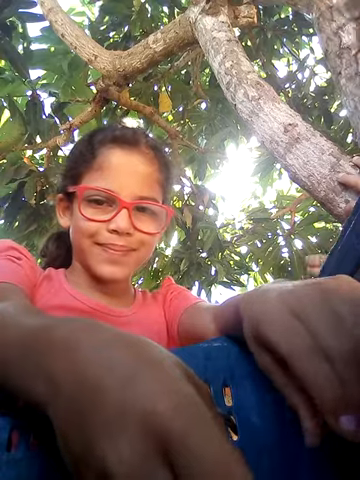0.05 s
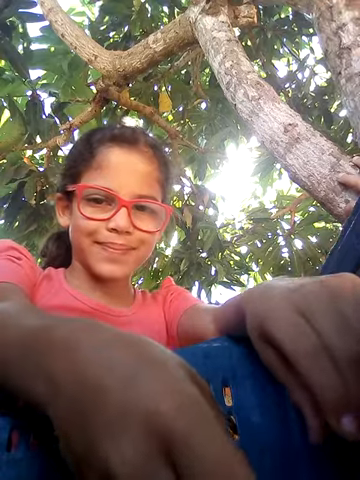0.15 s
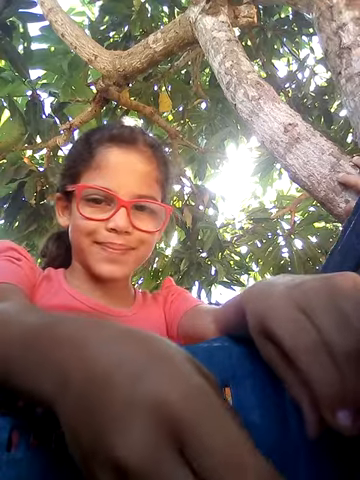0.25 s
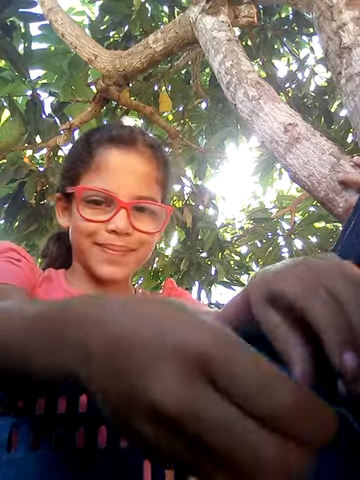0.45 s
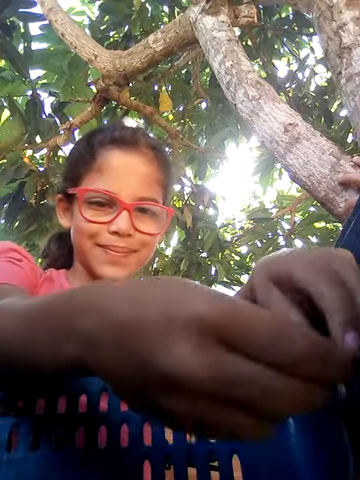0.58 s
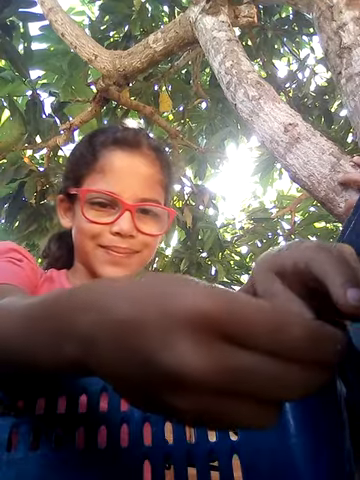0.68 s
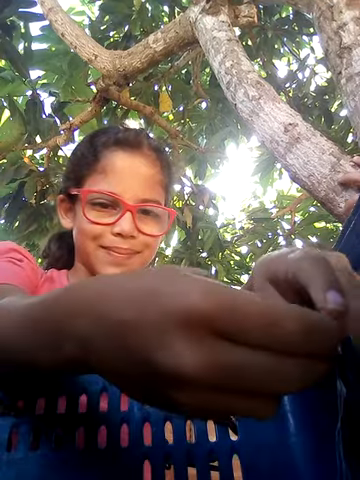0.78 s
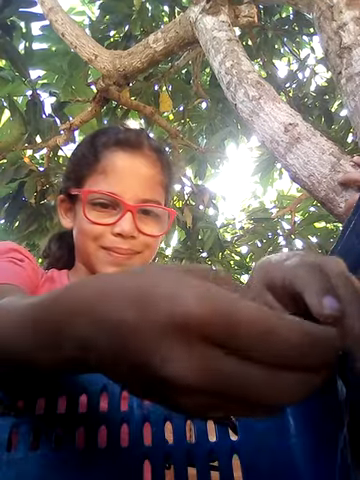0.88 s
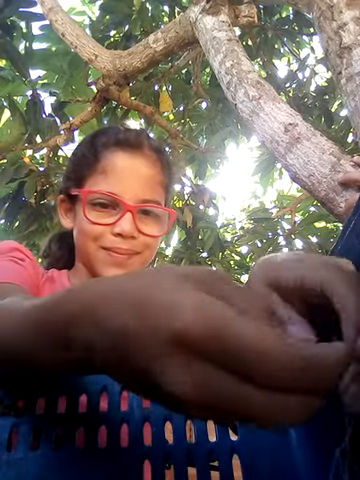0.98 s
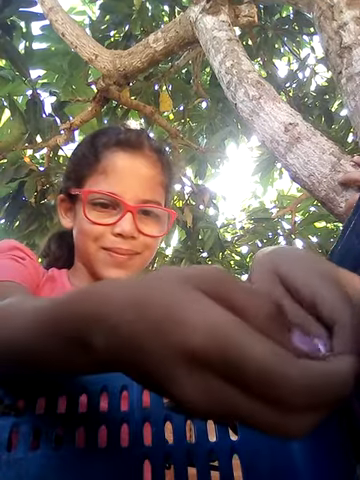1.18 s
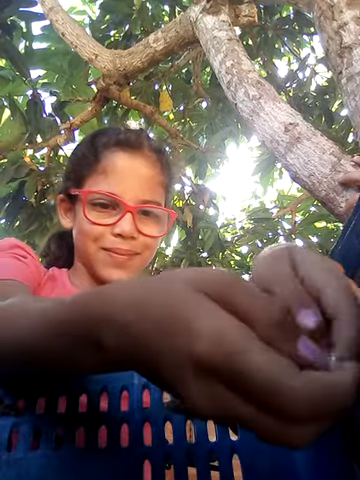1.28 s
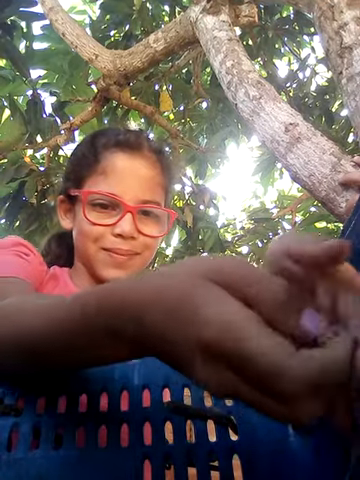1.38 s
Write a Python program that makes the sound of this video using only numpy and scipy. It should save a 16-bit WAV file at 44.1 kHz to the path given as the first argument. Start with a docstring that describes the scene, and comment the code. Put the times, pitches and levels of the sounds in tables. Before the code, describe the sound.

Small plastic beads drop into a plastic container with a hollow knock and a bright rattle. They shift, drop again and settle, then two dry snaps follow. The sound is close, in a quiet garden.

```python
"""Small plastic beads drop into a plastic container, shift about and drop again, close by.
Heavy impacts excite the hollow body's resonances, single beads click, and many tiny collisions merge
into a rattle that settles; two dry snaps follow. Sliding friction hisses just before the first drop.
Hands shift with a soft rumble, and the garden behind is quiet."""
import sys
import numpy as np
from scipy.fft import rfft, irfft, next_fast_len
from scipy.io import wavfile
from scipy.ndimage import uniform_filter1d, map_coordinates

SR = 44100
rng = np.random.default_rng(int(sys.argv[2]) if len(sys.argv) > 2 else 0)


def wrap_up_sound(samples):
    """Save the sound to the file named by the first command line argument, as 16-bit audio."""
    columns = np.atleast_2d(samples).T
    # keep every value between -1 and 1, then stretch to whole-number steps
    tamed = np.clip(columns, -1, 1)
    steps = np.round(tamed * 32767).astype(np.int16)
    wavfile.write(sys.argv[1], SR, steps)


N = 63945
FFT = next_fast_len(N + SR // 2, True)
HZ = np.fft.rfftfreq(FFT, 1 / SR)
T = np.arange(N) / SR
TREBLE_SHARE = 1 / (1 + (7070 / (HZ + 1)) ** 10)  # rises from 0 to 1 around 7070 Hz

def amp(db):
    """Decibels to amplitude ratio."""
    return 10 ** (np.asarray(db) / 20)

def unit(x):
    """Normalisation to rms 1."""
    return x / np.sqrt(np.mean(x ** 2) + 1e-20)

def crest(x):
    """Normalisation of the loudest millisecond to rms 1."""
    return x / np.sqrt(uniform_filter1d(np.mean(x ** 2, 0), 44).max())

def along(points):
    """Interpolation of (Hz, value) points over log frequency."""
    hz, values = np.transpose(points)
    return np.interp(np.log(HZ + 1), np.log(hz + 1), values)

def sides(db):
    """Panning by level difference, left over right."""
    return amp(np.array([np.atleast_1d(db), -np.atleast_1d(db)]) / 2)

def causal(db):
    """Minimum-phase response from a gain curve, by folding the cepstrum."""
    cepstrum = irfft(np.log(amp(db) + 1e-6))
    half = len(cepstrum) // 2
    cepstrum[1:half] *= 2
    cepstrum[half + 1:] = 0
    return np.exp(rfft(cepstrum))

def filtered(x, response):
    """Convolution as a product of spectra."""
    return irfft(rfft(x, FFT) * response, FFT)[..., :N]

def add(out, start, sound):
    """Superposition of a sound from its start in seconds."""
    i = max(round(start * SR), 0)
    out[:, i:i + sound.shape[1]] += sound[:, :N - i]

def hiss(spectrum):
    """Spectrally shaped stereo noise of rms 1."""
    return unit(filtered(rng.standard_normal((2, N)), amp(along(spectrum))))

def wobble(knots_per_s):
    """Smooth modulation: a spline through random knots."""
    return map_coordinates(rng.standard_normal(int(N * knots_per_s / SR) + 4), [T * knots_per_s])

# The garden's hiss. Each row: frequency in Hz, level in dB.
GARDEN_SPECTRUM = [(500, -7), (1400, 1.5), (2100, -5), (3000, -5), (4200, -25), (5600, 6.5), (6300, 1),
                   (8200, -23.5), (11500, -18), (13000, -34), (15200, -11.5), (16500, -49)]
def garden():
    """Stationary noise forms a faint ambient floor."""
    return amp(-64) * hiss(GARDEN_SPECTRUM) * sides(db=-2.0)

# The hands' rumble. Each row: frequency in Hz, level in dB.
RUMBLE_SPECTRUM = [(25, -16.5), (60, -19.5), (125, -0.5), (220, -3), (320, -11), (450, -17), (3000, -77.5)]
# Its envelope. Each row: time in seconds, level in dB.
RUMBLE_LEVELS = [(0, -75.5), (.11, -58), (.17, -68.5), (.33, -64), (.64, -65), (.93, -72.5), (1.05, -63.5),
                 (1.17, -61), (1.235, -78), (1.3, -63.5), (1.43, -76.5)]
# Finger bumps. Each row: start in seconds, level in dB.
FINGER_BUMPS = [(.042, -54.5), (1.179, -53), (1.388, -55.5)]
def hands():
    """Shifting hands make modulated low noise; each bump is a damped oscillation."""
    bump_hz, rise_s, t60_s = 189, 0.0069, 0.023
    level_db = np.interp(T, *np.transpose(RUMBLE_LEVELS)) + 3.0 * wobble(55)
    out = amp(level_db) * hiss(RUMBLE_SPECTRUM)
    envelope = (1 - np.exp(-T / rise_s)) * amp(-60 * T / t60_s)
    bump = crest(envelope * np.sin(2 * np.pi * bump_hz * T)[None])
    for start, db in FINGER_BUMPS:
        add(out, start, amp(db) * bump)
    return out * sides(db=16)

# The sliding hiss. Each row: frequency in Hz, level in dB.
SLIDE_SPECTRUM = [(500, -15), (2600, -16.5), (3050, 6.5), (3500, -4), (3850, 0.5), (4400, -19), (6000, -12),
                  (8000, -49)]
def slide():
    """Sliding friction gives a thin, uneven noise that ends at the first drop."""
    start_s, rise_s, end_s, fall_s = 0.048, 0.032, 0.21, 0.0045
    stroke = np.clip((T - start_s) / rise_s, 0, 1) * np.clip((end_s - T) / fall_s, 0, 1)
    return amp(-48.5 + 2.7 * wobble(130)) * stroke * hiss(SLIDE_SPECTRUM) * sides(db=-7)

# Stereo phase. Each row: frequency in Hz, lead of the left channel in radians.
LEFT_LEAD = [(380, -1), (780, 1), (1000, 1.5), (1250, 4), (1750, 4), (2500, 7.5), (3400, 7.5), (4300, 5),
             (5300, 4.5)]
def arrival():
    """Phase difference: a wave reaches the two channels out of step."""
    return np.array([np.ones(len(HZ)), np.exp(-1j * along(LEFT_LEAD))])

def bright_peak_db(pitch_hz, height_db=8.5, width_octaves=0.15):
    """A bright spectral peak, usually near 5.3 kHz, that colours clicks, snaps and rattle."""
    return height_db * np.exp(-(np.log2((HZ + 1) / pitch_hz) / width_octaves) ** 2)

def impacts(rows, spectrum, rise_s, t60_s, tail_db, tail_t60_s, size=4096):
    """Two-stage decay: each impact is a bright crack, then a scatter between the walls."""
    out, t, hz = np.zeros((2, N)), np.arange(size) / SR, np.fft.rfftfreq(size, 1 / SR)
    envelope = (1 - np.exp(-t / rise_s)) * (amp(-60 * t / t60_s) + amp(tail_db - 60 * t / tail_t60_s))
    phase = np.array([np.interp(hz, HZ, channel) for channel in arrival()])
    tone = rfft(irfft(causal(along(spectrum)), FFT)[:size]) * phase
    for start, db, pitch_hz, treble_db in rows:
        crack = (rng.standard_normal(size) + rng.standard_normal((2, size))) * envelope
        colour = causal(np.interp(hz, HZ, bright_peak_db(pitch_hz) + treble_db * TREBLE_SHARE))
        impact = irfft(rfft(crack) * tone * colour)[:, :size // 2]
        add(out, start, amp(db) * crest(impact))
    return out

def ringing(modes, rise_s=0.00039):
    """Free vibration: a sum of damped modes, with random phase in each channel."""
    t = np.arange(SR // 4) / SR
    tones = sum(amp(db - 60 * t / t60) * np.sin(2 * np.pi * (hz * t + rng.random((2, 1))))
                for hz, db, t60 in modes)
    return tones * (1 - np.exp(-t / rise_s))

# Beads snapping in the fingers. Each row: start in seconds, level in dB, pitch in Hz, treble in dB.
FINGER_SNAPS = [(.9991, -35.5, 6100, -7), (1.0562, -28, 4860, -12)]
# A snap's tone colour. Each row: frequency in Hz, level in dB.
SNAP_SPECTRUM = [(200, -23.5), (700, -10), (1450, -4), (2000, -16.5), (3600, -13.5), (6600, -3.5),
                 (8200, -37), (16000, -61)]
# A snap's modes. Each row: frequency in Hz, level in dB, T60 in seconds.
WOODY_MODES = [(1470, -5.5, 0.013), (2690, -19, 0.015), (5150, -2, 0.0066), (6420, -16, 0.017)]
# One bead ringing on. Each row: frequency in Hz, level in dB, T60 in seconds.
PING_MODES = [(6200, -31, 0.043), (6960, -43, 0.052)]
def snaps():
    """Heavy damping makes the snaps dry and woody; the first leaves a bead ringing."""
    out = impacts(FINGER_SNAPS, SNAP_SPECTRUM, rise_s=0.0001, t60_s=0.013, tail_db=-23, tail_t60_s=0.11)
    for start, db, _, _ in FINGER_SNAPS:
        add(out, start, amp(db + 1.5) * crest(ringing(WOODY_MODES)))
    add(out, FINGER_SNAPS[0][0], ringing(PING_MODES))
    return out * sides(db=4.5)

def collisions(per_s=2400, spread_db=0.5):
    """A Poisson process of tiny impulses, slightly uneven in size."""
    hits = rng.random(N) < per_s / SR
    return hits * rng.choice([-1, 1], N) * amp(spread_db * np.clip(rng.standard_normal(N), -2, 2))

# The container's response. Each row: frequency in Hz, gain in dB.
CONTAINER_SPECTRUM = [(30, -46.5), (380, -32.5), (450, -16), (510, 5), (620, 2.5), (730, -1), (830, -11),
                      (1050, -11.5), (1300, -11), (1900, -31), (4000, -62), (9000, -77.5)]
def container(hardness):
    """Resonance of the hollow body; harder contact tilts it upward, in dB per octave."""
    octaves = np.log2(np.clip(HZ, 400, 2000) / 400)
    return causal(along(CONTAINER_SPECTRUM) + hardness * octaves) * arrival()

# Loose beads. Each row: time in seconds, rattle level in dB, container murmur level in dB.
LOOSE_LEVELS = [(0.203, -60, -84), (0.216, -22.5, -25), (.25, -29.5, -38.5), (.29, -27, -39.5),
                (.335, -29, -44.5), (0.374, -36, -47), (.435, -45.5, -45.5), (0.453, -37.5, -48.5),
                (0.494, -39.5, -34), (.53, -48.5, -51), (0.589, -55.5, -54.5), (0.616, -41.5, -47.5),
                (0.666, -53.5, -53), (0.722, -42.5, -43.5), (0.785, -48, -50), (0.806, -23.5, -34.5),
                (0.848, -63, -42), (0.879, -35, -43), (0.913, -47, -51.5), (0.956, -56.5, -58),
                (1.002, -48, -51), (1.039, -51.5, -61.5), (1.13, -62, -83)]
def loose_envelopes():
    """Amplitude envelopes of rattle and murmur as the beads shift and settle."""
    times, rattle_db, murmur_db = np.transpose(LOOSE_LEVELS)
    return amp(np.interp(T, times, rattle_db)), amp(np.interp(T, times, murmur_db))

def murmur():
    """Forced vibration: loose beads keep the container sounding."""
    return unit(filtered(collisions(), container(hardness=5.55)))

# Landings. Each row: start in seconds, level in dB, hardness in dB per octave.
LANDINGS = [(.0835, -41.5, -6.5), (0.1275, -37, 12.5), (0.2061, -7, -3.5), (0.2182, -16, -5.5),
            (.3955, -34.5, 5), (0.4791, -21, 8), (.4898, -30, 6), (.4955, -31.5, 3.5), (0.8, -18.5, 2),
            (0.8239, -19, 3.5), (0.8328, -23, 13), (.932, -39, -3), (.9685, -38.5, 8)]
def knocks():
    """Each landing sounds the container's impulse response."""
    out = np.zeros((2, N))
    for start, db, hardness in LANDINGS:
        delay = np.exp(-2j * np.pi * HZ * start)
        out += amp(db) * crest(irfft(container(hardness) * delay, FFT)[:, :N])
    return out

# Overall tone colour of the clicks and rattle, as heard. Each row: frequency in Hz, level in dB.
CLATTER_SPECTRUM = [(100, -30), (380, -24.5), (550, -16.5), (1400, -12), (1950, -13), (3100, -8),
                    (4500, -4.5), (5900, -5), (6800, -11.5), (8300, -34), (10500, -32.5), (12500, -40.5),
                    (14000, -44), (15100, -28), (16300, -49.5)]
# The rattle's brightness. Each row: time in seconds, treble gain in dB.
RATTLE_TREBLE = [(.29, 7.5), (.4, -6.5), (.55, -15), (.83, -7.5), (.96, -18)]
def rattle():
    """Dense collisions merge into noise with a bright spectral peak."""
    swarm = collisions() + 0.67 * np.array([collisions(), collisions()])
    response = causal(along(CLATTER_SPECTRUM) + bright_peak_db(pitch_hz=5330)) * arrival()
    noise = unit(filtered(swarm, response))
    treble_gain = amp(np.interp(T, *np.transpose(RATTLE_TREBLE)))
    return noise + (treble_gain - 1) * filtered(noise, TREBLE_SHARE)

# Single beads. Each row: start in seconds, level in dB, pitch in Hz, treble in dB.
BEAD_CLICKS = [(.1265, -36.5, 6050, -3), (.2066, -13, 5350, 8), (.2186, -16.5, 5500, 8.5),
               (.2255, -15.5, 4770, 16.5), (.2402, -20.5, 5200, 7), (.2648, -25.5, 5360, 8.5),
               (.275, -17.5, 4840, 9), (.2895, -15.5, 5220, 13), (.3184, -15, 5200, 3.5),
               (.3355, -34, 5840, 14.5), (.349, -24, 5260, -3.5), (.3828, -30, 4970, -5),
               (.3945, -33, 8760, 12.5), (.4, -29.5, 4400, 0), (.4255, -28, 3470, 5),
               (.4424, -21, 5600, 5.5), (.451, -34.5, 5130, -0.5), (.4795, -24.5, 5370, 0),
               (.4898, -27.5, 5300, -3.5), (.6245, -32, 5700, -2), (.7695, -29.5, 5460, -15),
               (.788, -27, 5400, 4.5), (.799, -14, 5350, 4), (.8252, -21, 5500, 0.5),
               (.836, -27, 5440, -3.5), (.854, -30, 5200, -10), (.8706, -32.5, 5440, -7),
               (.9674, -24, 5440, -10)]
def clicks():
    """Single impacts stand out of the rattle as separate transients."""
    return impacts(BEAD_CLICKS, CLATTER_SPECTRUM, rise_s=0.0017, t60_s=0.0088,
                   tail_db=-14.5, tail_t60_s=0.044)

# The beads' faint ring. Each row: frequency in Hz, relative gain in dB.
BEAD_MODES = [(3700, -6), (4930, -16), (5060, -10), (5305, -12), (5410, -7), (5695, -16.5), (6090, -11.5)]
# Their stereo balance. Each row: frequency in Hz, left over right in dB.
BEAD_BALANCE = [(400, 1), (1900, 2.5), (2400, -2), (3300, -8.5), (4300, -0.5), (5200, -2.5), (6000, -3),
                (7500, 3), (15000, 3.5)]
def beads(excitation, ring_db=-4, t60_s=0.083):
    """Rattle and clicks drive the beads' modes, second-order resonators that add a faint ring."""
    bandwidth_hz = np.log(1000) / np.pi / t60_s
    damping = 1j * HZ * bandwidth_hz
    ring = sum(amp(db) * damping / (hz ** 2 - HZ ** 2 + damping) for hz, db in BEAD_MODES)
    return filtered(excitation, (1 + amp(ring_db) * ring) * sides(along(BEAD_BALANCE)))

def scene():
    """Linear superposition of all sources in stereo."""
    rattle_gain, murmur_gain = loose_envelopes()
    hollow = (murmur_gain * murmur() + knocks()) * sides(db=2.0)
    clatter = beads(rattle_gain * rattle() + clicks())
    return hollow + clatter + snaps() + slide() + hands() + garden()

def record(dry):
    """An ideal low-pass filter limits the band to 16.5 kHz."""
    return filtered(dry, HZ < 16500)

dry = scene()
out = record(dry)
wrap_up_sound(out)
```